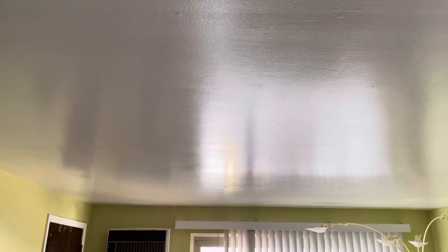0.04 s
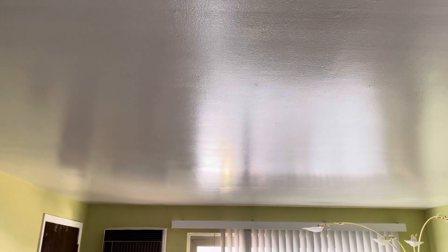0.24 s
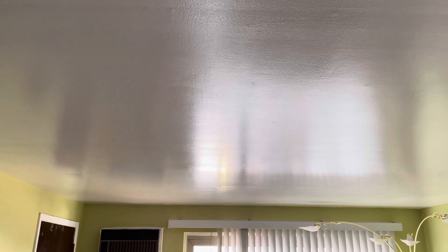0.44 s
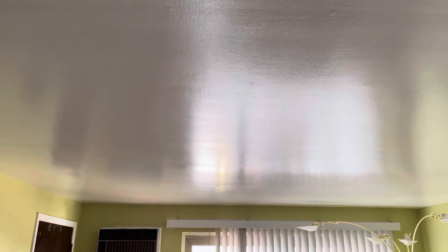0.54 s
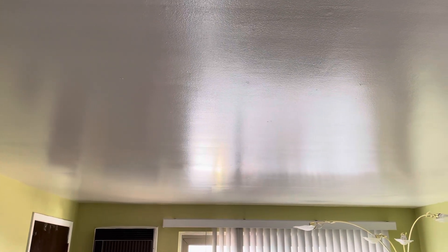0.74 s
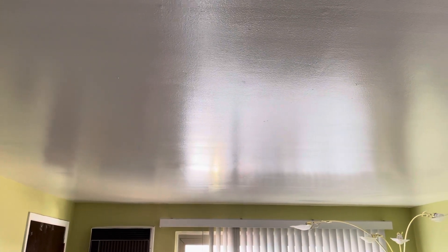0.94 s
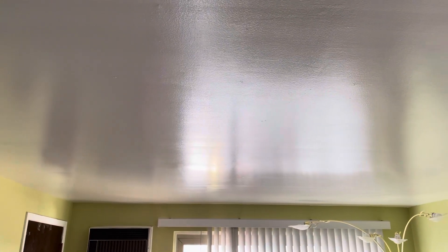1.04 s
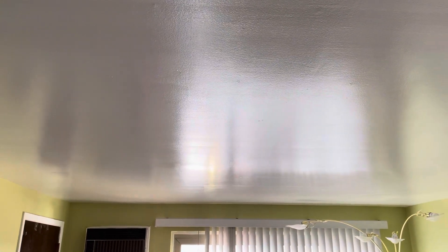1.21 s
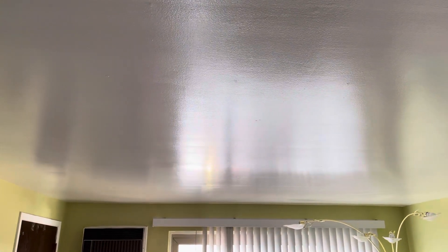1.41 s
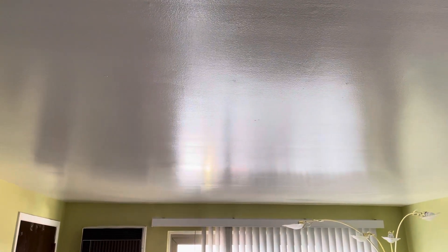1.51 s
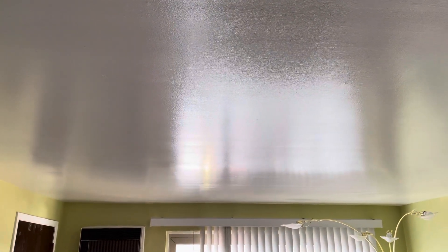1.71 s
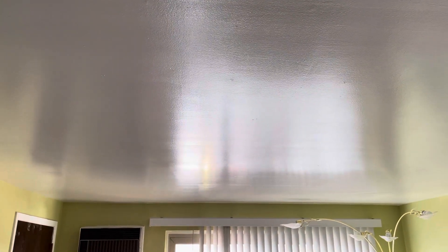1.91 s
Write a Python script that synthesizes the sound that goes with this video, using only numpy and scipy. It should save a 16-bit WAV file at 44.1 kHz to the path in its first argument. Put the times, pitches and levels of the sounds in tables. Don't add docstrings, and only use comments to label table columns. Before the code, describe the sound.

Hard knock on the floor above cracks and booms through a quiet room, weaker thumps following

```python
import sys
import numpy as np
from scipy import signal
from scipy.fft import rfft, irfft, next_fast_len
from scipy.io import wavfile

SR = 44100
rng = np.random.default_rng(int(sys.argv[2]) if len(sys.argv) > 2 else 0)


def transcribe(signal):
    frames = np.atleast_2d(signal).T
    limited = np.clip(frames, -1, 1)
    pcm = np.round(limited * 32767).astype(np.int16)
    wavfile.write(sys.argv[1], SR, pcm)


N = 85995


def undb(db):
    return 10 ** (np.asarray(db) / 20)


def rms_one(x):
    return x / np.sqrt(np.mean(x ** 2) + 1e-20)


def at_hz(points, hz):
    table_hz, value = np.transpose(points)[:2]
    return np.interp(np.log(hz), np.log(table_hz), value)


def bandpass(x, order, low_hz, high_hz):
    return signal.sosfilt(signal.butter(order, [low_hz, high_hz], "band", fs=SR, output="sos"), x)


def drift(rate_hz):
    pole = np.exp(-2 * np.pi * rate_hz * 40 / SR)
    noise = rng.standard_normal(N // 40 + 2002)
    slow = signal.lfilter([1], [1, -2 * pole, pole ** 2], noise)[2000:]
    return np.interp(np.arange(N) / 40, np.arange(len(slow)), rms_one(slow))


def ring(clicks, hz, t60_s):
    r, w = undb(-60 / (t60_s * SR)), 2 * np.pi * hz / SR
    return signal.lfilter([0, np.sin(w)], [1, -2 * r * np.cos(w), r * r], clicks + 1e-18)


EDGES_HZ = 22 * 2 ** np.arange(0, 9.6, 1 / 3)


def bands():
    white = rng.standard_normal((2, 2, 2 * N + SR // 2))
    out = []
    for k, (low, high) in enumerate(zip(EDGES_HZ, EDGES_HZ[1:])):
        out.append((np.sqrt(low * high), bandpass(white[k % 2], 2, low, high)))
    return out


# [t/s, level/dB]
ACTIVITY = [(0.0, -56.5), (0.172, -61.5), (0.33, -53.5), (0.516, -59.5), (0.684, -59), (0.994, -56.5),
            (1.286, -59.5), (1.472, -59.5), (1.694, -51), (1.95, -61.5)]
# [f/Hz, density/dB per Hz]
FLOOR = [(34, -27), (52, -8), (170, -12.5), (290, -27.5), (620, -27), (1400, -44.5), (5000, -53.5),
         (13000, -61)]
# [f/Hz, width/Hz, level/dB]
DRONES = [(56.96, 19, -56.5), (121.9, 4.7, -71.5), (166.7, 16, -70), (625, 59, -83)]
FLOOR_DB, RUMBLE_FOLLOWS = -60.5, 0.83


def rumble(noises):
    s, db = np.transpose(ACTIVITY)
    swing_db = RUMBLE_FOLLOWS * (np.interp(np.arange(N) / SR, s, db) - np.mean(db))
    bed = 0
    for hz, noise in noises:
        moving_db = (1.5 * drift(17) + swing_db) / (1 + hz / 900)
        bed = bed + undb(at_hz(FLOOR, hz) + moving_db) * noise[:, SR // 2:SR // 2 + N]
    out = undb(FLOOR_DB) * rms_one(bed)
    for hz, width_hz, level_db in DRONES:
        t60_s = np.log(1000) / np.pi / width_hz
        tone = ring(rng.standard_normal((2, 2 * N)), hz, t60_s)[:, N:]
        out = out + undb(level_db + swing_db) * rms_one(tone)
    return out


BODY_BELOW_HZ, BRIGHT_ABOVE_HZ = 1600, 3020


def knock_colour(hz, body_db, bright_db_per_octave):
    body = body_db / (1 + (hz / BODY_BELOW_HZ) ** 4)
    octaves_above = np.log2(1 + (hz / BRIGHT_ABOVE_HZ) ** 2) / 2
    return body + bright_db_per_octave * octaves_above


# [t/s, peak/dB, body re crack/dB, brightness/dB per octave, direct share/dB]
KNOCKS = [
    (0.2283, -37, -2, -2.5, 5),
    (0.633, -73.5, 9, -1, 0),
    (0.8877, -58.5, 5, -13, -4.5),
    (0.9091, -58.5, -6, -10.5, 8),
    (1.0064, -47.5, 2.5, -10, 4),
    (1.5519, -58.5, 8, -2, 3.5),
    (1.577, -75, 22, -14, -5),
]
# [f/Hz, level/dB, t60/s]
BOARD = [(561, -11, 0.055), (1210, -28.5, 0.067), (2283, -7, 0.0075), (2470, -2.5, 0.023),
         (2880, -5.5, 0.012), (3130, -8, 0.012), (3750, -10, 0.011), (4870, -17.5, 0.0067),
         (5900, -16, 0.0051), (8750, -6, 0.0083), (11800, -32, 0.0054)]
# [delay/s, level/dB, brightness/dB per octave]
CONTACTS = [
    (.0002, -8, 0),
    (.0020, 0, 0),
    (.0145, -6, -14),
]
CONTACT_SPREAD_DB = 2.5


def cracks():
    out = np.zeros((2, N))
    luck = rng.normal(0, 1, (len(KNOCKS), len(BOARD), len(CONTACTS), 2))
    for m, (hz, mode_db, t60_s) in enumerate(BOARD):
        clicks = np.zeros((2, N))
        for k, (s, db, body_db, bright_db, direct_db) in enumerate(KNOCKS):
            for c, (lag_s, contact_db, dull_db) in enumerate(CONTACTS):
                level_luck, sign_luck = luck[k, m, c]
                gain_db = db + direct_db + mode_db + contact_db + CONTACT_SPREAD_DB * level_luck
                gain_db += knock_colour(hz, body_db, bright_db + dull_db)
                at = int((s + lag_s) * SR) + np.array([0, round(SR / hz / 4)])
                clicks[[0, 1], at] = (-1) ** m * undb(gain_db) * np.array([1, np.sign(sign_luck)])
        out += bandpass(ring(clicks, hz, t60_s), 1, hz / 1.5, hz * 1.5)
    return out


# [f/Hz, density/dB per Hz]
CRACK = [(200, -3), (560, -10.5), (950, -13.5), (1550, -19.5), (2150, -10.5), (3100, -16), (6000, -30.5),
         (13000, -33)]
# [f/Hz, t60/s]
ROOM_T60 = [(200, .5), (600, .44), (1300, .4), (2200, .36), (3200, .31), (5000, .24), (12000, .2)]
TAIL_DB, TAIL_FLICKER_DB = -6, 0.8
BUILD_S, BODY_BUILD_S = 0.0067, 0.004


def knock_tails(noises):
    t = np.arange(0, N + 16, 16) / SR
    s, db, body_db, bright_db, _ = np.transpose(KNOCKS)[:, :, None]
    age_s = np.maximum(t - s, 0)
    out = 0
    for hz, noise in noises:
        build_s = BUILD_S + BODY_BUILD_S / (1 + (hz / BODY_BELOW_HZ) ** 2)
        gain_db = db + TAIL_DB + 22 + at_hz(CRACK, hz) + knock_colour(hz, body_db, bright_db)
        decay_db = -60 * age_s / at_hz(ROOM_T60, hz)
        power = (undb(gain_db + decay_db) * np.expm1(-age_s / build_s)) ** 2
        envelope = np.interp(np.arange(N) / SR, t, np.sqrt(power.sum(axis=0)))
        out = out + envelope * undb(TAIL_FLICKER_DB * drift(60)) * noise[:, -N:]
    return out


# [t/s, push sign, low joist/dB, middle joist/dB, high joist/dB]
BOOMS = [(.231, 1, -34, -83, -44), (0.263, -1, -38.5, -30.5, -32.5), (0.326, 1, -58, -47.5, -50.5),
         (.381, 1, -89, -53, -43), (0.441, 1, -40, -49.5, -59), (.918, 1, -62, -40, -53.5),
         (1.01, 1, -40.5, -43.5, -57.5), (1.051, 1, -59, -45, -51.5), (1.099, 1, -70, -57.5, -51),
         (1.17, 1, -61, -60.5, -63), (1.553, 1, -60, -52.5, -53), (1.598, 1, -47, -41.5, -45),
         (1.640, -1, -56, -57, -64.5), (1.71, 1, -46.5, -54, -54), (1.792, -1, -58, -59, -57)]
# [f/Hz, t60/s]
JOISTS = [(40, 0.15), (58, 0.41), (78, 0.37)]
# [f/Hz, level/dB, t60/s]
SLABS = [(115, -8, .25), (165, -16, .25), (210, -15, .2), (315, -20, .12)]
SLAB_DB, SLAB_SPREAD_DB, PUSH_HZ = 0.5, 2.5, 148


def booms():
    rows = np.array(BOOMS)
    at = (rows[:, 0] * SR).astype(int)
    luck_db = rng.normal(SLAB_DB, SLAB_SPREAD_DB, (len(rows), len(SLABS)))
    modes = [(hz, t60_s, rows[:, k + 2]) for k, (hz, t60_s) in enumerate(JOISTS)]
    modes += [(hz, t60_s, rows[:, -1] + db + luck_db[:, k]) for k, (hz, db, t60_s) in enumerate(SLABS)]
    out = np.zeros(N)
    for hz, t60_s, db in modes:
        clicks = np.zeros(N)
        clicks[at] = np.sign(rows[:, 1]) * undb(db)
        out += ring(clicks, hz, t60_s)
    return signal.sosfilt(signal.butter(2, PUSH_HZ, fs=SR, output="sos"), out)


# [t/s, level/dB]
TAPS = [
    (0.635, -60),
    (0.891, -58),
    (1.010, -54),
    (1.235, -63),
    (1.422, -75),
    (1.447, -70),
]
TAP_HZ, TAP_T60_S = 517, 0.1


def taps():
    s, db = np.transpose(TAPS)
    clicks = np.zeros(N)
    clicks[(s * SR).astype(int)] = undb(db)
    return bandpass(ring(clicks, TAP_HZ, TAP_T60_S), 2, TAP_HZ / 1.3, TAP_HZ * 1.3)


# [f/Hz, share/0-1]
LIKENESS = [(60, .97), (200, .85), (400, .55), (1200, .4), (2500, .62), (5000, .7), (7500, .92),
            (12000, .96)]
# [f/Hz, phase/rad]
LEAD = [(200, 0.01), (1200, -3.0), (2000, -6.2), (6100, -6.5), (7650, -9.3), (8900, -9.6), (10400, -12.4),
        (13000, -12.8), (14000, -15.6)]
# [f/Hz, level/dB]
TILT = [(100, 0.3), (600, -.5), (1500, 1), (2600, 1), (5500, 2.5), (8000, -.2), (12000, -.2)]


def microphones(pair):
    size = next_fast_len(N + SR // 4)
    hz = np.maximum(np.fft.rfftfreq(size, 1 / SR), 1)
    one, other = rfft(pair, size)
    alike = np.clip(at_hz(LIKENESS, hz), 0, 1)
    lag = np.exp(-1j * at_hz(LEAD, hz))
    half_tilt = undb(at_hz(TILT, hz) / 2)
    right = (alike * one + np.sqrt(1 - alike ** 2) * other) * lag
    return irfft([one * half_tilt, right / half_tilt], size)[:, :N]


def scene():
    noises = bands()
    one_path = (booms() + taps()) * [[1], [0]]
    return microphones(rumble(noises) + cracks() + knock_tails(noises) + one_path)


def low_pass(x):
    return signal.sosfilt(signal.butter(12, 13710, fs=SR, output="sos"), x)


def record(dry):
    x = signal.sosfilt(signal.butter(2, 22, "high", fs=SR, output="sos"), dry)
    x = signal.sosfilt(signal.cheby2(12, 60, 15700, fs=SR, output="sos"), x)
    return low_pass(x)


dry = scene()
out = record(dry)
transcribe(out)
```